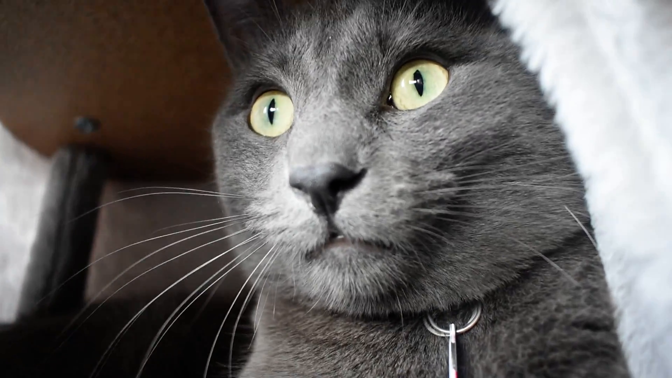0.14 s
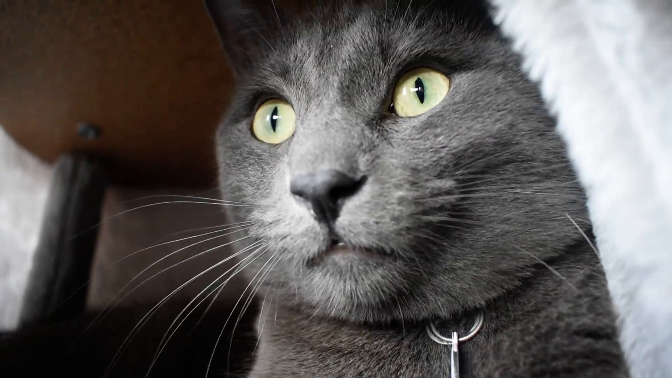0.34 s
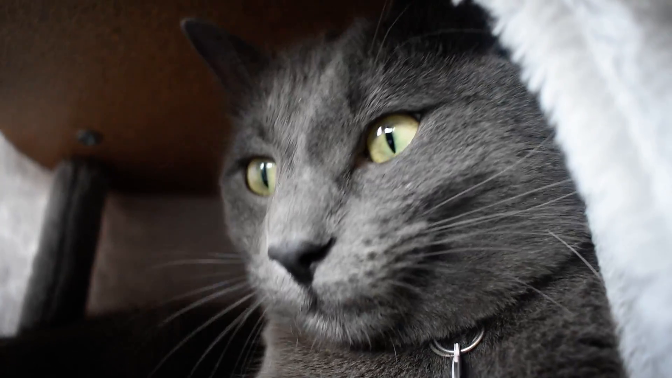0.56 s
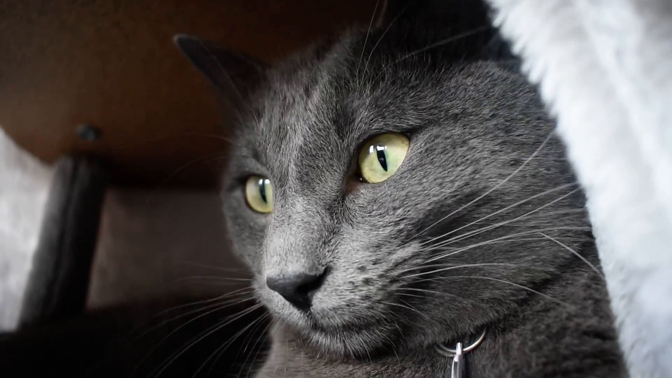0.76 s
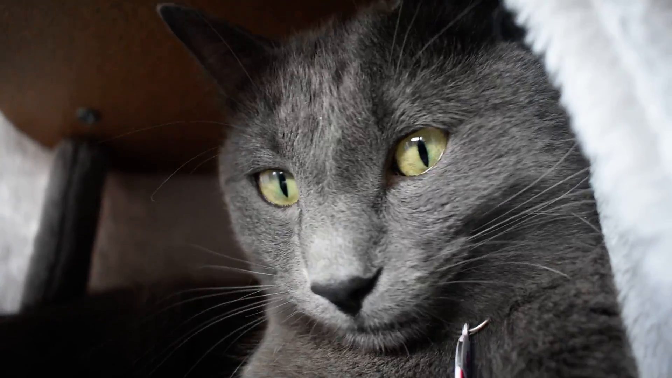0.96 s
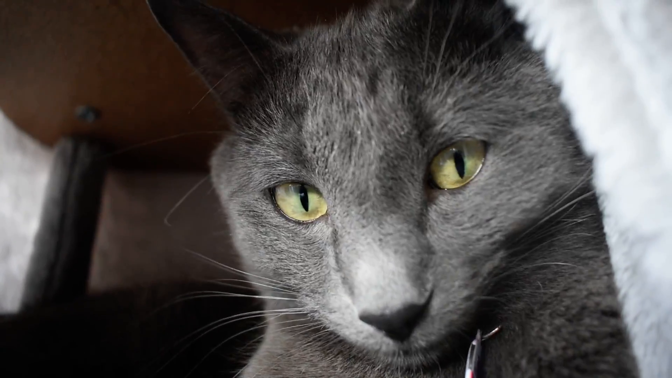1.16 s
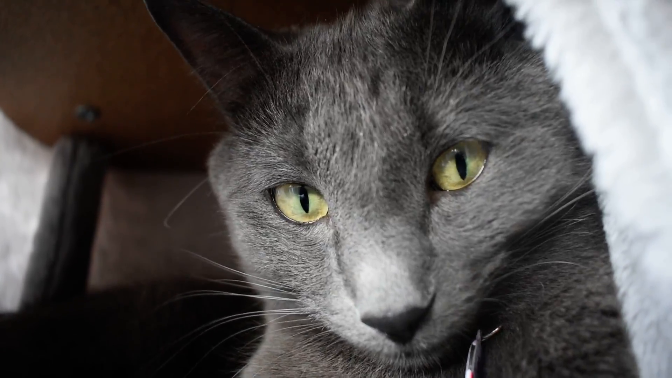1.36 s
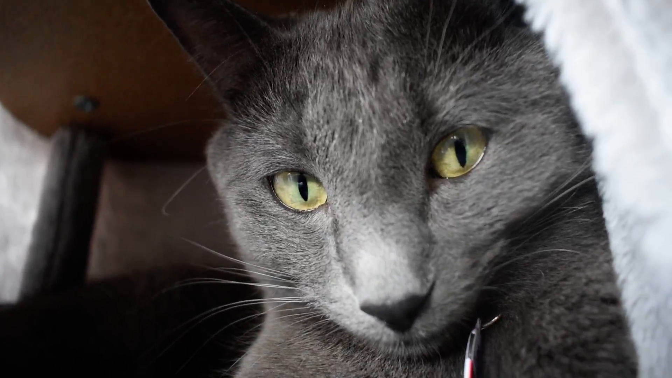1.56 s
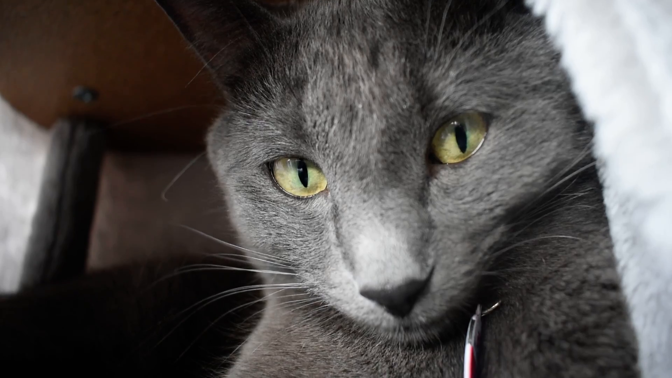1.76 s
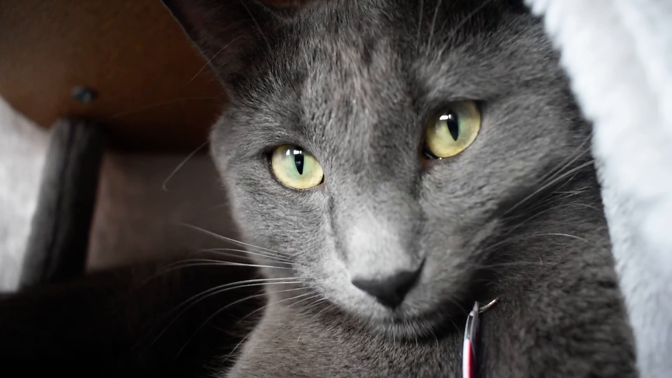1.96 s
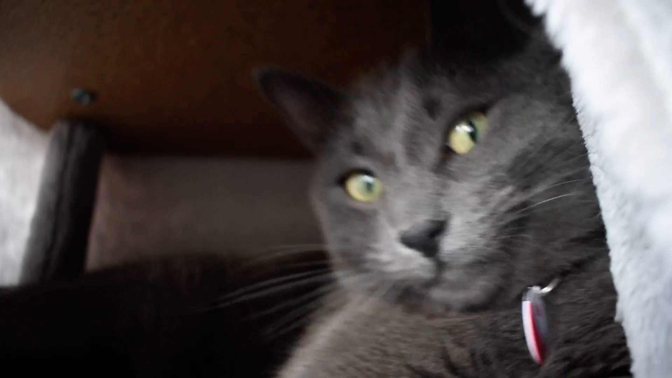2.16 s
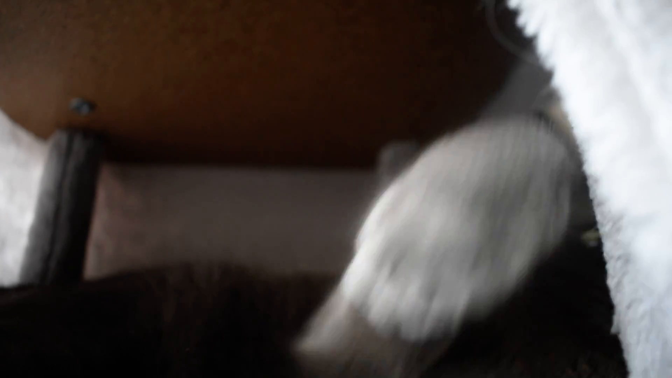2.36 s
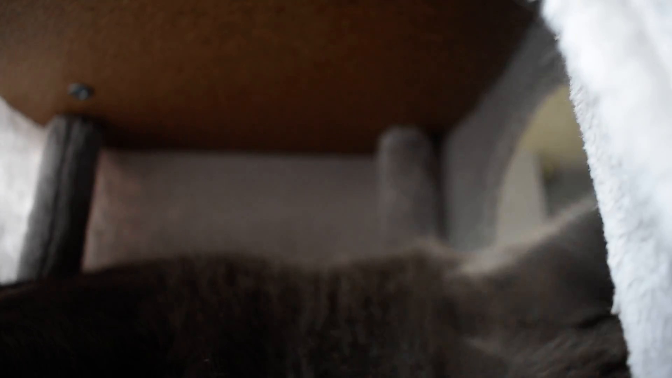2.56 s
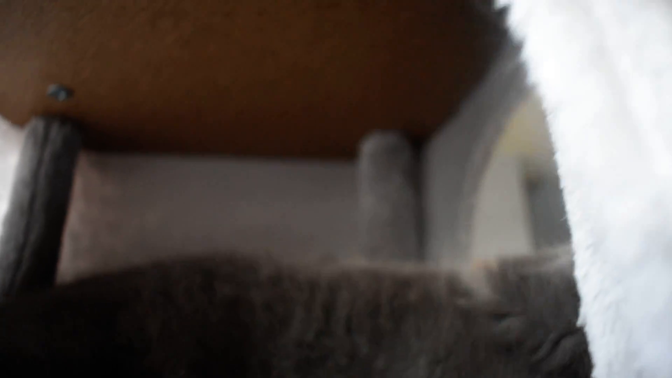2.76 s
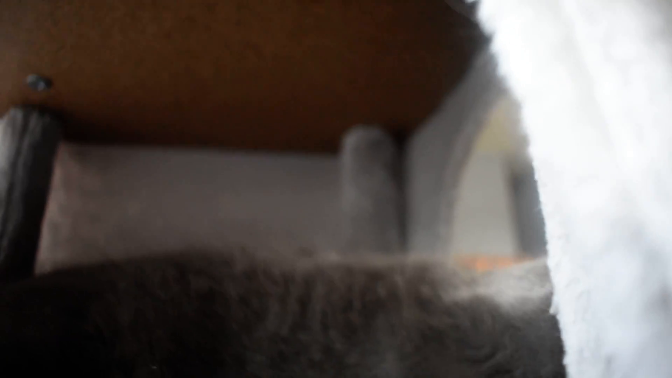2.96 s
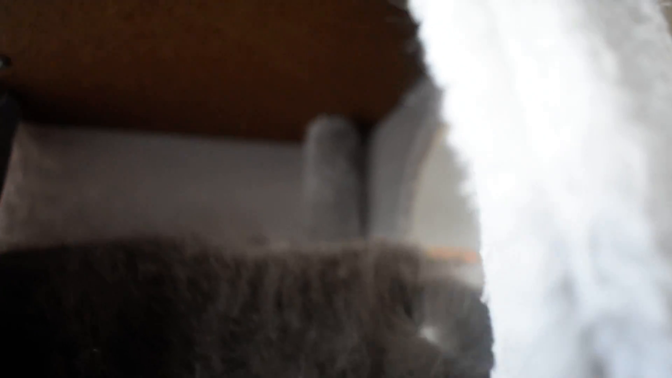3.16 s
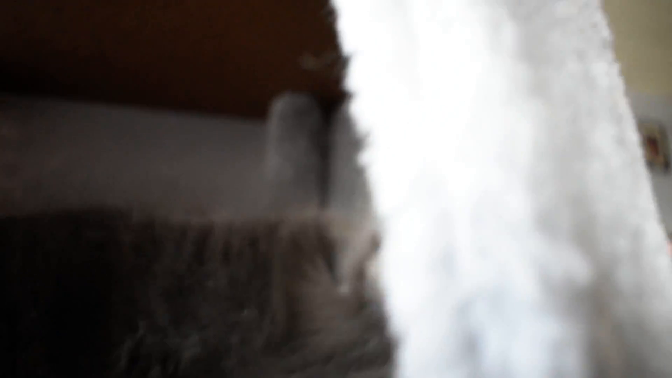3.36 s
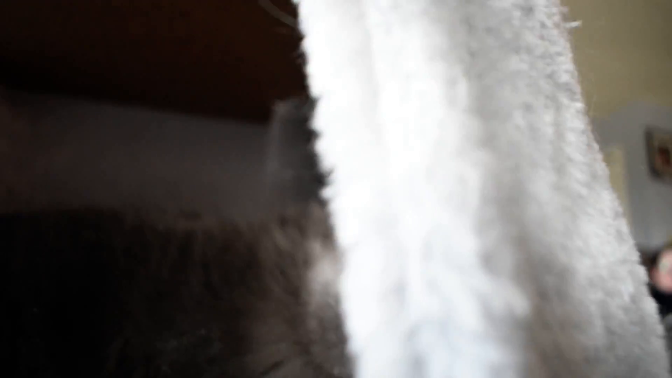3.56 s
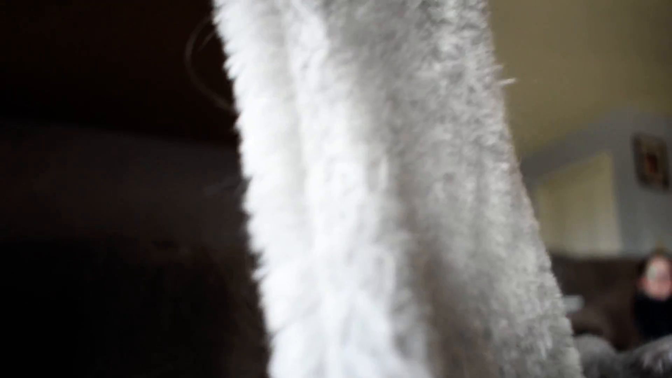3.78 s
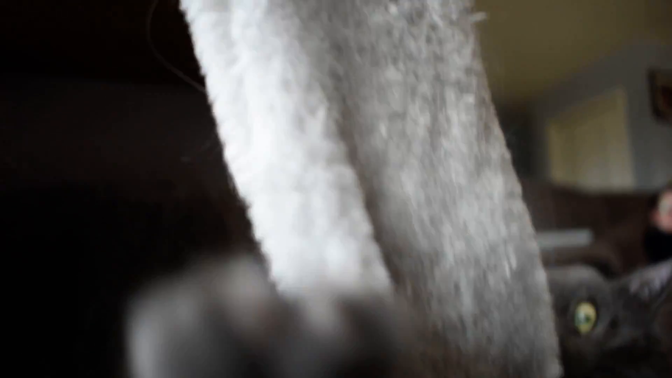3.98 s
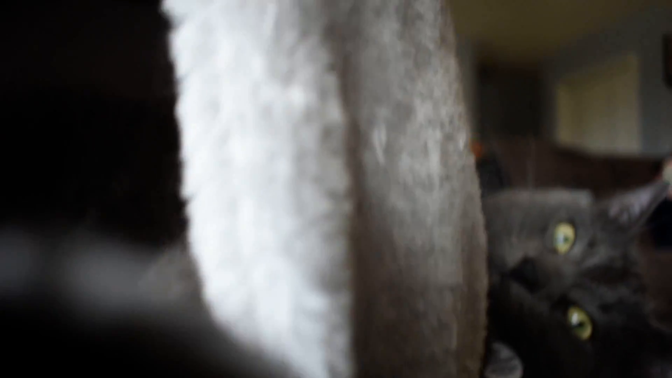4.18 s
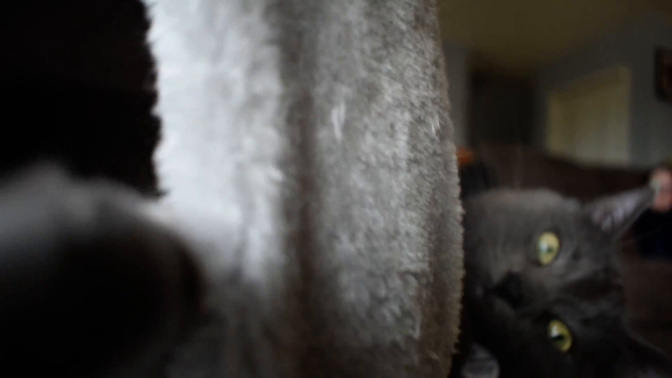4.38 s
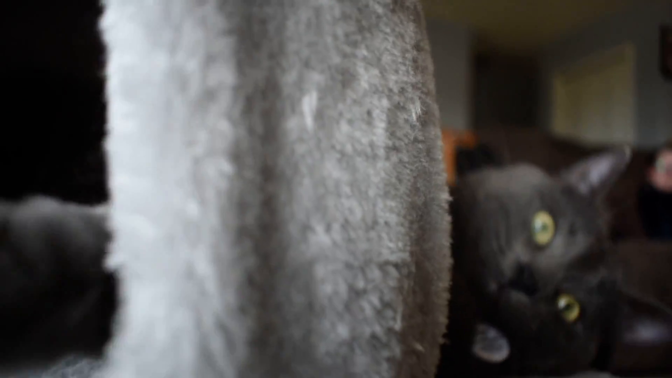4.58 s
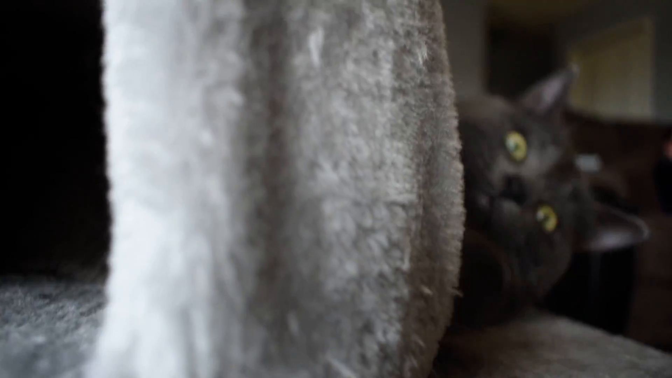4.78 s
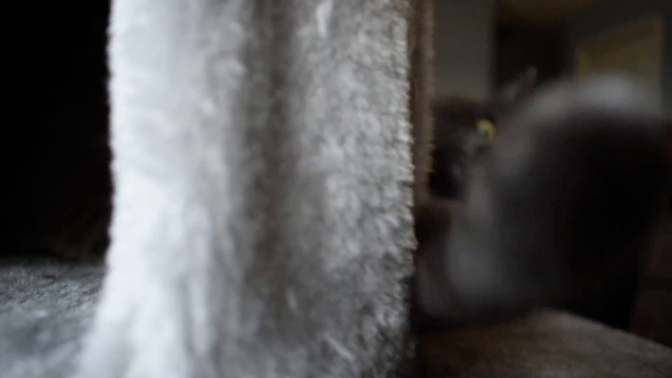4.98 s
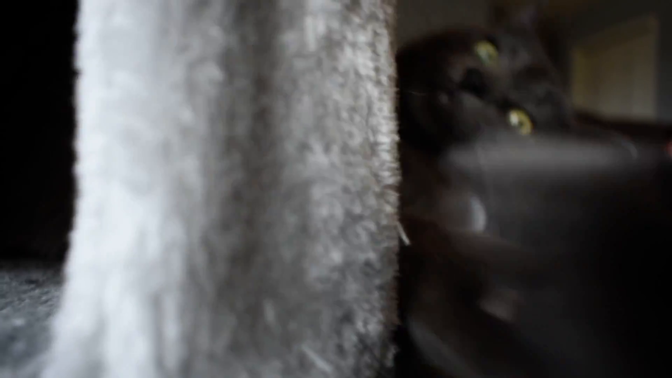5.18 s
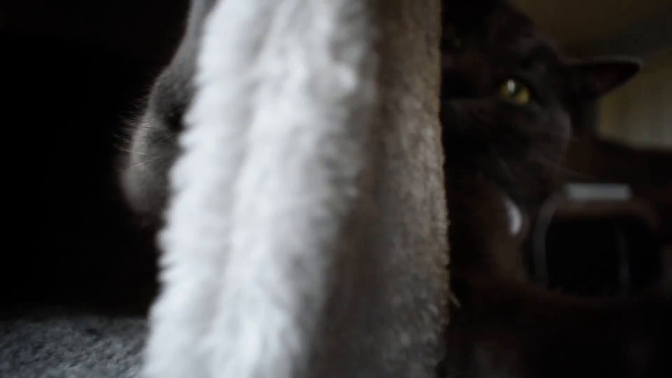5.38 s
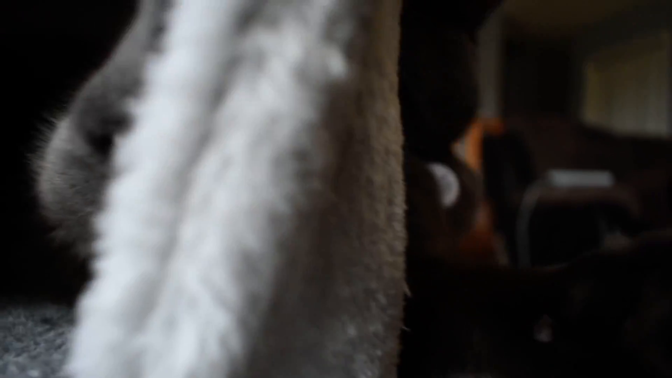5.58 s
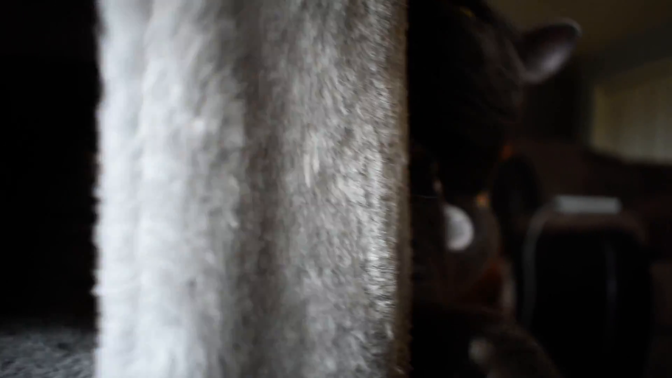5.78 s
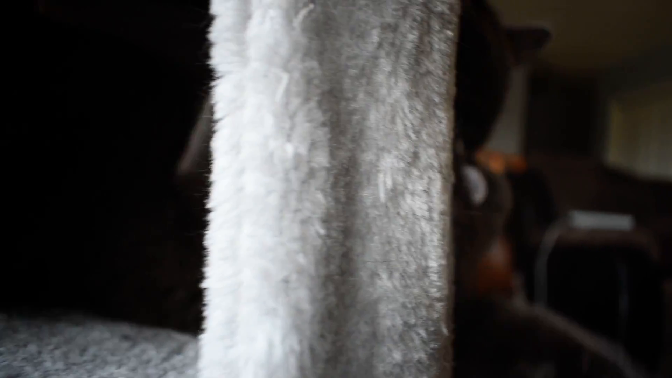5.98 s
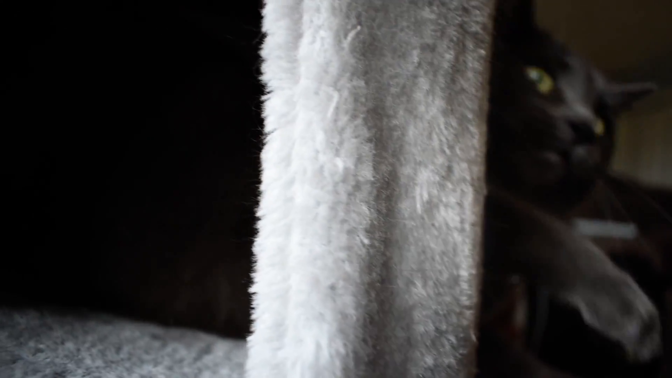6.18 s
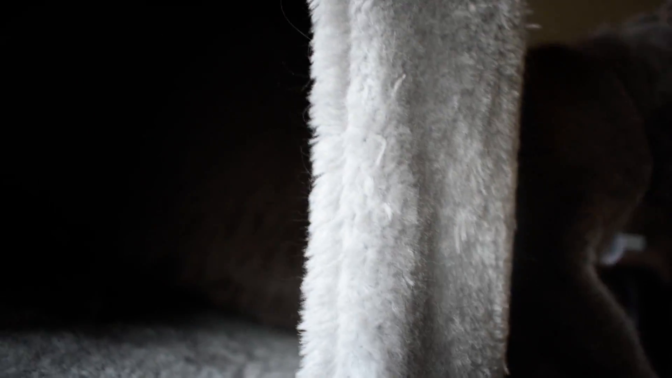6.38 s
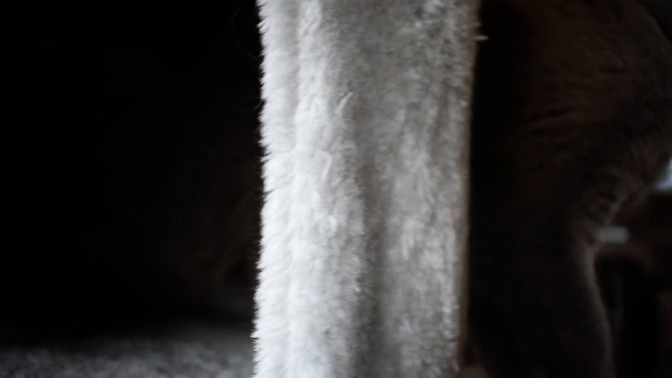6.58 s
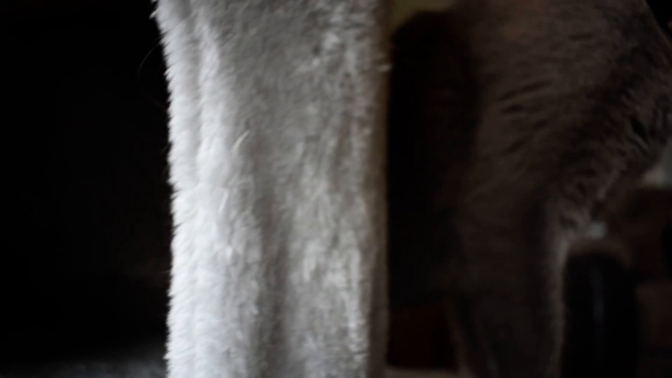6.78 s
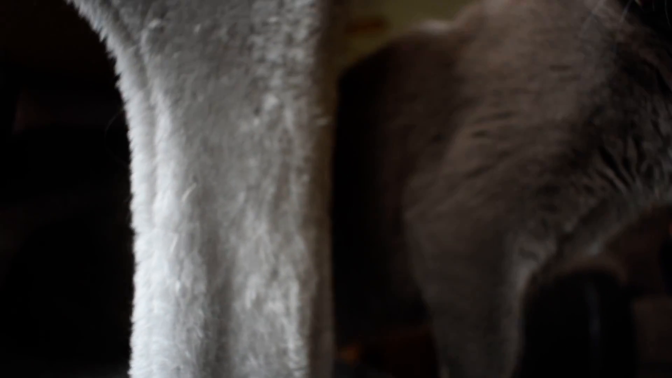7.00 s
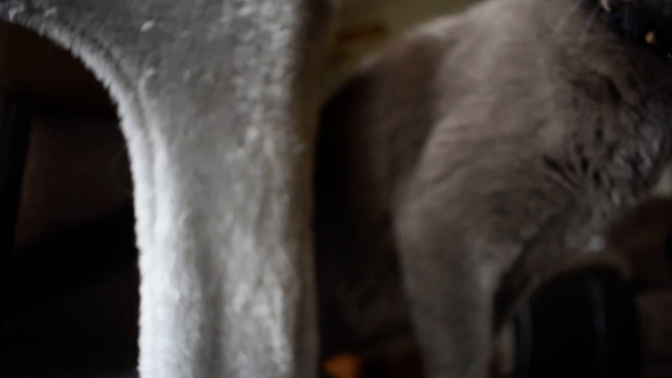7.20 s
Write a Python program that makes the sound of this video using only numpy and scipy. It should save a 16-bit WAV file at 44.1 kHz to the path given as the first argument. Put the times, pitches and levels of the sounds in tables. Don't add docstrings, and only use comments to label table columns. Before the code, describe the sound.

In a quiet room, a cat rubs faintly against fleece very close to the microphone as a collar tag's jingle dies away. A hollow thud sounds across the room. Rustling grows brisk and hissy with soft paw pats and a small knock, another distant thud follows, then one hard, rattling claw swipe hits the microphone casing. Lighter brushing and tiny ticks remain over low room tone.

```python
import sys
import numpy as np
from scipy import signal
from scipy.fft import rfft, irfft, next_fast_len
from scipy.io import wavfile
from scipy.ndimage import uniform_filter1d

SR = 44100
rng = np.random.default_rng(int(sys.argv[2]) if len(sys.argv) > 2 else 0)


def store_pcm(level_fs):
    pcm = np.round(np.clip(level_fs, -1, 1) * 32767).astype(np.int16)
    wavfile.write(sys.argv[1], SR, np.atleast_2d(pcm).T)


def decibels_to_gain(level_db):
    exponent = np.asarray(level_db, float) / 20
    return 10 ** exponent


N = 319501


def evened(x):
    return x / np.sqrt(np.mean(x ** 2) + 1e-20)


def read(points, hz):
    f, value = np.transpose(points)
    return np.interp(np.log(hz + 1), np.log(f + 1), value)


def add(mix, at_s, sound):
    part = mix[round(at_s * SR):][:len(sound)]
    part += sound[:len(part)]


def coloured(x, spectrum):
    size = next_fast_len(len(x))
    gain = decibels_to_gain(read(spectrum, np.fft.rfftfreq(size, 1 / SR)))
    return evened(irfft(rfft(x, size) * gain, size)[:len(x)])


def resonate(x, hz, width_hz):
    r = np.exp(-np.pi * width_hz / SR)
    return signal.lfilter([1, 0, -1], [1, -2 * r * np.cos(2 * np.pi * hz / SR), r * r], x)


def wander(per_s):
    pole = np.exp(-2 * np.pi * per_s / SR)
    return evened(signal.lfilter([1], [1, -pole], rng.standard_normal(N)))


def fibres(per_s, spread_db, flicker_db):
    slips = decibels_to_gain(spread_db * np.minimum(rng.exponential(1, N), 4)) * (rng.random(N) < per_s / SR)
    grit = 0.5 * evened(slips * rng.standard_normal(N)) + rng.standard_normal(N)
    return grit * decibels_to_gain(flicker_db * wander(35))


def patchy(x, depth_db):
    z = signal.stft(x, nperseg=512)[2]
    field = uniform_filter1d(rng.standard_normal(z.shape), size=12, axis=0)
    field = uniform_filter1d(field, size=8, axis=1)
    return evened(signal.istft(z * decibels_to_gain(depth_db * evened(field)), nperseg=512)[1][:N])


def strokes():
    # [start t/s, swell t/s, fade t/s, crest fur
    # hiss level/dB, crest drag level/dB]
    rubs = [
        (0, 0.0029, 0.17, -63, -49),
        (.21, 0.39, 0.14, -57.5, -56.5),
        (.79, 0.035, 0.13, -56.5, -58),
        (1.0, 0.051, .06, -62, -61),
        (1.22, 0.36, 0.15, -54, -51.5),
        (2.0, 0.17, 0.23, -56.5, -53),
        (2.2, .12, 0.26, -59.5, -55),
        (2.61, 0.14, 0.43, -59.5, -51.5),
        (2.9, 0.34, 0.18, -57.5, -54.5),
            (3.317, .004, 0.072, -49, -49), (3.319, 0.066, 0.14, -40, -43.5),
              (3.5, 0.066, 0.43, -47, -47.5), (3.55, 0.15, 0.045, -48, -49.5),
              (3.77, 0.083, 0.11, -44.5, -53), (3.941, 0.021, 0.15, -44, -46),
              (4.14, 0.021, 0.26, -55, -54.5), (4.34, .04, 0.22, -56.5, -70), (4.47, 0.024, 0.32, -58, -49),
              (4.71, 0.02, 0.23, -63, -58), (4.9, 0.065, 0.24, -52.5, -57),
              (5.03, 0.28, 0.27, -48.5, -52.5),
            (5.32, 0.0098, 0.044, -41.5, -45.5), (5.36, .01, 0.3, -51.5, -56),
               (5.48, 0.062, 0.34, -52, -56), (5.721, 0.16, .1, -48.5, -56),
               (5.93, 0.13, 0.18, -43.5, -44.5), (6.1, .1, 0.3, -52.5, -54), (6.25, 0.044, 0.15, -53, -63),
               (6.42, 0.12, .05, -58.5, -60), (6.55, 0.24, 0.36, -60.5, -59),
               (6.9, .015, 0.075, -55.5, -54.5), (6.9, 0.099, 0.12, -60.5, -66),
               (7.07, 0.11, 0.11, -55, -51.5), (7.22, .02, .1, -58, -47.5)]
    touch_s, swell_db, fade_db = 0.023, 10.5, 18
    t = np.arange(N // 64 + 2) * 64 / SR
    power = 1e-12
    for start_s, swell_s, fade_s, *crests_db in rubs:
        u = t - start_s
        swell_s = max(swell_s, 0.003)
        shape_db = np.minimum(swell_db * (u / swell_s - 1), fade_db * (swell_s - u) / fade_s)
        shape = decibels_to_gain(shape_db) * np.clip(u / touch_s + 1, 0, 1)
        power = power + np.outer(decibels_to_gain(crests_db), shape) ** 2
    return [np.interp(np.arange(N) / SR, t, np.sqrt(p)) for p in power]


def rubbing():
    # [f/Hz, density level/dB per Hz]
    fur_spectrum = [(880, -39), (1500, -4), (1760, 0), (4160, 1.5), (4780, 1), (5280, 2.5), (7920, 2),
                    (11100, -17), (15100, -32), (16000, -49)]
    # [f/Hz, density level/dB per Hz]
    drag_spectrum = [(150, 4), (250, -7.5), (388, -4), (531, -6), (647, 1), (761, -1.5), (855, -1),
                     (1140, -5.5), (1250, -4), (4000, -13.5), (5200, -51), (8800, -120)]
    fur = coloured(fibres(per_s=8600, spread_db=3.5, flicker_db=1.35), fur_spectrum)
    fur = patchy(fur, depth_db=1.0)
    drag = coloured(fibres(per_s=1500, spread_db=2.0, flicker_db=1.97), drag_spectrum)
    drag = signal.sosfilt(signal.butter(2, 200, "high", fs=SR, output="sos"), drag)
    hiss_level, drag_level = strokes()
    return hiss_level * fur + drag_level * drag


def catches():
    # [t/s, peak level/dB, centre f/Hz, t60/s]
    snags = [(0.7971, -42, 7730, 0.1), (.262, -45, 8200, .05), (2.748, -37, 7800, .06),
             (2.758, -39.5, 8440, 0.045), (3.317, -28.5, 8200, 0.35), (3.3645, -27.5, 7900, 0.15),
             (3.5239, -28, 6800, 0.071), (3.5693, -30, 7700, 0.13), (3.6626, -32.5, 7500, 0.31),
             (3.795, -35, 7090, 0.086), (3.833, -34, 6900, 0.12), (3.951, -25.5, 6700, 0.2),
             (4.372, -41, 6500, .1), (4.498, -38.5, 8440, .06), (4.635, -46, 7000, 0.17),
             (4.9202, -40, 6160, 0.1), (5.334, -27, 7000, 0.093)]
    out, t = np.zeros(N), np.arange(9000) / SR
    for at_s, db, hz, t60_s in snags:
        burst = resonate(resonate(rng.standard_normal(9000), hz, 2100), hz, 2100)
        add(out, at_s, decibels_to_gain(db - 15 - 60 * t / t60_s) * evened(burst))
    return out


def tap(db, hz, t60_s, snap, snap_hz, push_s=0):
    t = np.arange(5000) / SR
    fade = decibels_to_gain(-60 * np.maximum(t - push_s, 0) / t60_s)
    shake = rng.standard_normal(5000) * fade
    shake[0] = 7.0
    width_hz = 0.95 * snap_hz
    crack = resonate(resonate(shake, snap_hz, width_hz), snap_hz, width_hz)
    ring = fade * np.sin(2 * np.pi * hz * t) * (1 - np.exp(-5.0 * hz * t))
    blow = (1 - snap) * ring / abs(ring).max() + snap * crack / abs(crack).max()
    return decibels_to_gain(db) * blow / abs(blow).max()


def swipe_blows():
    # [t/s, peak level/dB, f/Hz, t60/s]
    skate = [
        (5.2724, -21, 4700, .009),
        (5.2716, -21, 6800, .016),
        (5.2735, -21, 4200, .015),
        (5.279, -24, 7500, .012),
        (5.2835, -24, 8300, .013),
        (5.2855, -20, 8400, .011),
        (5.2897, -21, 4900, .009),
        (5.2963, -25, 8000, .007),
        (5.336, -34, 6900, .04),
        (5.3146, -27, 3700, .012),
    ]
    # [t/s, peak level/dB, ring f/Hz, push t/s]
    shell = [
        (5.2652, -29, 1250, .002),
        (5.272, -28, 1650, .004),
        (5.279, -11.5, 1450, 0.0017),
        (5.279, -19.5, 2200, 0.002),
        (5.2848, -9.3, 1490, 0.0027),
        (5.2995, -26, 1500, .003),
        (5.2962, -17, 1300, .001),
        (5.2962, -22.5, 2600, 0.0015),
        (5.312, -32, 1500, 0.0042),
    ]
    # [t/s, peak level/dB, ring f/Hz, t60/s]
    jolts = [
        (5.2648, -29, 330, 0.04),
        (5.2699, -20.5, 205, 0.05),
        (5.2799, -17.5, 1050, 0.035),
        (5.2795, -26, 420, 0.04),
        (5.2958, -18.5, 300, 0.028),
        (5.3015, -28, 450, 0.04),
    ]
    blows = [(*row, 0.62, row[2]) for row in skate]
    blows += [(s, db, hz, 0.006, 0.15, 2900, push_s) for s, db, hz, push_s in shell]
    blows += [(*row, 0.41, 900) for row in jolts]
    return blows


def paw_blows():
    # [t/s, peak level/dB, ring f/Hz, snap share 0-1]
    pads = [(0.294, -42.5, 600, .6), (0.361, -47, 794, 0.47), (0.5505, -43, 900, 0.45),
            (.589, -47, 1770, 0.34), (0.6335, -40, 800, 0.5), (0.704, -52, 854, 0.3),
            (0.84, -45.5, 861, 0.4), (0.937, -45, 528, 0.3), (1.197, -44.5, 476, 0.44),
            (2.3187, -41, 1700, 0.4), (2.3285, -41, 1150, 0.44), (2.83, -50, 961, 0.7),
            (2.779, -44, 700, 0.5), (3.046, -44.5, 540, 0.85), (3.663, -29, 323, 0.46),
            (3.99, -36.5, 378, 0.5), (6.034, -32.5, 770, 1)]
    # [t/s, peak level/dB, ring f/Hz, snap share 0-1]
    claws = [(1.5334, -30, 7900, 0.5), (2.621, -45, 4900, 0.6), (5.662, -43.5, 4800, 0.2),
             (5.8773, -43, 7800, 0.5), (4.726, -50, 4500, .1), (6.3042, -40.5, 5900, 0.2),
             (6.4645, -47.5, 4600, 0.2), (7.1858, -42, 6000, 1), (6.79, -40.5, 6600, .81),
             (6.5302, -49, 7200, .2), (6.507, -52, 8500, .3), (5.8652, -42, 4600, 0.9)]
    # [t/s, peak level/dB, ring f/Hz]
    scratches = [
        (2.7483, -45, 1950),
        (2.752, -47, 2240),
        (2.757, -37, 2200),
        (2.7608, -39, 1560),
        (2.7642, -36, 1650),
        (2.7774, -58, 1390),
        (5.866, -46, 1800),
        (7.094, -43, 2600),
    ]
    # [t/s, peak level/dB, ring f/Hz, t60/s]
    bumps = [
        (0.928, -47.5, 237, 0.13),
        (2.324, -40, 264, 0.016),
        (3.037, -41, 217, 0.069),
        (3.662, -49, 330, 0.028),
        (4.092, -39, 83.4, 0.092),
        (5.367, -39, 108, 0.032),
        (5.368, -33, 338, .015),
    ]
    # [t/s, peak level/dB, ring f/Hz, t60/s, snap share 0-1]
    knuckles = [
        (1.533, -37, 556, .04, 0.05),
        (1.582, -25.5, 890, 0.033, 0.1),
        (4.1622, -32.5, 1625, 0.025, .05),
        (4.162, -34, 2770, 0.015, .05),
        (4.163, -30, 640, 0.019, 0.45),
        (4.162, -31, 1000, 0.024, 0.47),
        (4.1629, -34.5, 400, 0.061, 0.6),
        (6.2045, -40, 2940, .014, 0.2),
        (6.2045, -49, 790, 0.016, 0.1),
    ]
    blows = [(s, db, hz, 0.02, snap, 1660) for s, db, hz, snap in pads]
    blows += [(s, db, hz, 0.0071, snap, 6000) for s, db, hz, snap in claws]
    blows += [(*row, 0.0099, 0.53, 2300) for row in scratches]
    blows += [(*row, 0.27, 464) for row in bumps]
    blows += [(*row, 1.35 * row[2]) for row in knuckles]
    return blows


def paws():
    out = np.zeros(N)
    for at_s, *blow in swipe_blows() + paw_blows():
        add(out, at_s, tap(*blow))
    port_hz = 11000
    return signal.lfilter(*signal.butter(2, port_hz, fs=SR), out)


def cracks():
    # [t/s, peak level/dB, ring f/Hz, t60/s, push t/s]
    contacts = [(5.27072, -16, 4880, .007, .0003), (5.27076, -16.5, 6580, .008, .0003),
                (5.27073, -13, 5400, .002, .0003), (5.27067, -19, 3670, .005, .0003),
                (5.27078, -21, 8200, .004, .0002), (5.2792, -21, 2900, .009, .0008),
                (5.279, -27, 760, .025, .001), (5.2961, -27, 800, .015, .001),
                (5.3005, -36, 9000, .005, .001), (5.877, -30.5, 5200, .0025, .0004),
                (5.877, -39, 4000, .003, .0003), (6.2045, -37, 4400, .005, .0006),
                (7.1846, -33, 6600, .002, .0001), (7.1991, -36, 6800, .002, .0001),
                (7.2157, -36, 6500, .002, .0001), (5.2963, -17, 1700, .002, .0002),
                (5.6617, -43, 5000, .003, .0004), (2.3295, -45, 1700, .01, .001),
                (2.3286, -38.5, 430, .02, .003), (2.7487, -41, 900, .012, .001),
                (2.7487, -42, 1950, .01, .001)]
    out = np.zeros(N)
    for at_s, db, hz, t60_s, push_s in contacts:
        add(out, at_s, tap(db, hz, t60_s, 0, hz, push_s))
    return out


def ticks():
    # [t/s, peak level/dB, low f/Hz, high f/Hz, t60/s]
    claw_ticks = [(0.551, -40.5, 1900, 2840, .02), (.6345, -44.5, 1500, 2880, .015),
                  (0.7047, -45.5, 1800, 2750, .015), (2.7485, -41, 900, 3800, .015),
                  (2.8315, -44, 400, 2500, .008), (2.852, -41, 600, 3200, .015),
                  (2.856, -43, 300, 1500, .012), (3.8345, -33, 5000, 8000, .01),
                  (4.1468, -44, 700, 2600, .012), (4.158, -44, 500, 2500, 0.012),
                  (4.4845, -33.5, 1100, 3460, 0.013), (4.5065, -30.5, 1200, 3500, .012),
                  (4.524, -31, 600, 1800, .02), (5.2713, -19, 3400, 7000, 0.025),
                  (5.279, -21, 2000, 3300, 0.012), (5.2835, -25, 6500, 10500, .02),
                  (.937, -44, 500, 2200, .015), (1.197, -46.5, 500, 2500, .015),
                  (5.2903, -27.5, 7800, 9300, 0.013), (5.3, -31, 6000, 9800, 0.021),
                  (5.3138, -25, 2000, 7200, 0.039), (5.3215, -39, 5000, 9500, .06),
                  (5.3255, -35, 5000, 9500, .03), (6.2044, -39, 2600, 5500, .01),
                  (6.3085, -44, 8000, 14500, .005), (6.4475, -49, 5000, 13000, .005),
                  (6.4612, -54, 7500, 13000, .005), (6.5375, -31.5, 3000, 14000, .009),
                  (7.1846, -33, 1400, 9000, 0.004), (7.1991, -38, 2500, 10000, .003),
                  (7.2157, -35, 2200, 9500, .003), (5.2865, -23, 2000, 3800, .04),
                  (5.2983, -23.5, 2000, 3800, 0.025), (5.3165, -33, 1700, 3200, .05),
                  (2.7605, -43, 2500, 4200, .015), (5.877, -42, 3500, 6500, .004),
                  (3.318, -36, 2500, 4500, .12), (3.366, -33, 2600, 4200, .04),
                  (3.3725, -31, 5000, 8600, .025), (5.279, -25, 6500, 10500, .014)]
    out, t = np.zeros(N), np.arange(3000) / SR
    for at_s, db, low_hz, high_hz, t60_s in claw_ticks:
        shake = rng.standard_normal(3000) * decibels_to_gain(-60 * t / t60_s)
        shake[0] = 4.0
        tick = signal.lfilter(*signal.butter(2, [low_hz, high_hz], "band", fs=SR), shake)
        tick = signal.lfilter(*signal.butter(2, 9000, fs=SR), tick)
        add(out, at_s, decibels_to_gain(db) * tick / abs(tick).max())
    return out


def thuds():
    # [t/s, level/dB, struck object]
    blows = [(1.516, -49.5, "box"), (1.534, -32, "box"), (1.552, -37.5, "box"), (1.581, -35.5, "box"),
             (4.4766, -36.5, "board"), (4.503, -36.5, "board"), (4.55, -45, "board"),
             (4.59, -46.5, "board"), (5.46, -58, "seat"), (5.503, -47.5, "seat"), (5.521, -52, "seat"),
             (5.555, -51, "seat"), (.15, -52.5, "fold"), (.53, -57, "fold"), (3.36, -50, "fold"),
             (4.6, -49.5, "fold"), (5.98, -54, "fold"), (6.06, -49, "fold"), (6.15, -53, "fold"),
             (4.348, -49.5, "leg"), (4.376, -47.5, "leg"), (4.479, -48, "leg")]
    names = ["box", "board", "seat", "fold", "leg"]
    # [f/Hz, density level/dB per Hz]
    spectra = [
        [(47, -44), (80, -21), (117, 2.5), (150, -19), (286, -15.5), (885, 3), (1660, -10), (1830, -14),
         (2070, -11), (2580, -18), (2920, -16), (7850, -31), (10000, -42), (13000, -76), (22000, -120)],
        [(150, -58), (250, -45), (460, -9), (494, -4), (539, -12.5), (605, -1), (661, -11), (710, -1.5),
         (922, -9.5), (1250, -5), (2110, -9), (2270, -8.5), (8000, -36.5), (10400, -58), (17600, -120)],
        [(300, -26), (700, 0), (800, -15), (1010, -7), (1340, 4), (1740, 6.5), (2290, -4), (3000, -9),
         (6000, -12), (10000, -60)],
        [(250, -40), (500, -5), (700, 4.5), (850, -2.5), (1100, -13), (2000, -22), (4000, -48)],
        [(250, -47), (600, 5.5), (1000, -4), (1500, -3), (2700, -2), (4100, -11), (7000, -14), (10000, -42)],
    ]
    # [f/Hz, t60/s]
    decay = [(250, 0.56), (700, 0.43), (1300, 0.41), (2500, 0.34), (5000, 0.28)]
    objects = dict(zip(names, spectra))
    out = np.zeros(N)
    for at_s, db, name in blows:
        echoes = rng.standard_normal(SR // 2) * (rng.random(SR // 2) < 0.3)
        hz, t, z = signal.stft(coloured(echoes, objects[name]), SR, nperseg=256)
        fade = decibels_to_gain(-60 * t / read(decay, hz)[:, None])
        tail = signal.istft(z * fade, SR, nperseg=256)[1]
        onset = np.minimum(np.arange(len(tail)) / (0.0027 * SR), 1)
        add(out, at_s, decibels_to_gain(db) * tail * onset)
    return out


def hollows():
    # [t/s, peak level/dB, ring f/Hz, t60/s, push t/s]
    notes_hollow = [(.5505, -44, 690, 0.037, .003), (.568, -49, 680, 0.035, .006),
                    (.535, -56, 1400, .05, 0.0091), (1.5355, -27, 700, 0.025, 0.0043),
                    (1.555, -37, 1350, .05, 0.009), (1.6, -37.5, 1180, .08, .015),
                    (1.556, -38, 560, .06, .012), (4.495, -41.5, 1770, .05, 0.014),
                    (4.56, -48, 1770, .06, .015), (1.544, -31, 1100, .06, .004),
                    (1.585, -44, 2100, .05, .008), (1.57, -34, 1150, .035, .005),
                    (1.543, -41, 2100, 0.095, .004), (1.612, -38, 840, 0.045, 0.0073),
                    (4.474, -41, 1250, .06, 0.0083), (4.484, -46, 2800, .03, .004),
                    (4.514, -42, 720, 0.04, 0.011), (4.545, -43, 1250, .06, 0.013),
                    (4.6, -47, 1250, 0.089, .01), (4.636, -52, 1300, 0.088, 0.0088),
                    (4.5, -43, 1240, .04, .008), (5.289, -27, 1560, 0.059, .002),
                    (1.598, -40, 960, .09, .012), (1.632, -45, 940, .07, .01), (1.657, -46, 860, .07, .012),
                    (1.69, -50, 1150, .1, .02), (1.59, -45, 1670, .06, .012), (4.48, -44, 3220, .03, .008),
                    (4.48, -44, 2200, .04, .008), (4.52, -41, 1250, .03, .006), (4.61, -45, 620, .08, .015),
                    (4.555, -46, 780, .07, .01), (3.36, -43, 720, .04, .01), (3.385, -41, 740, .04, .008),
                    (3.401, -42, 730, .05, .008), (4.66, -52, 700, .1, .02)]
    out = np.zeros(N)
    onset = np.minimum(np.arange(1, 5001) / (0.0028 * SR), 1)
    for at_s, db, hz, t60_s, push_s in notes_hollow:
        add(out, at_s, tap(db, hz, t60_s, 0, hz, push_s) * onset)
    return out


def tag():
    # [f/Hz, width f/Hz, level/dB]
    modes = [(695, 76, -58), (1020, 66, -60), (1610, 30, -64), (2370, 30, -66), (2600, 30, -64),
             (3200, 40, -72), (4070, 35, -65), (5050, 70, -67.5), (5360, 30, -75), (5890, 30, -75),
             (6100, 140, -62), (6350, 30, -72), (6670, 30, -66), (6940, 20, -60), (7190, 60, -70),
             (7710, 40, -66), (8230, 40, -71), (8900, 44, -72), (9390, 200, -69)]
    t = np.arange(SR // 2) / SR
    ring = sum(decibels_to_gain(db) * evened(resonate(rng.standard_normal(len(t)), hz, w)) for hz, w, db in modes)
    fade = decibels_to_gain(-60 * np.maximum(t - 0.05, 0) / 0.28)
    return np.pad(ring * fade, (0, N - len(t)))


def air():
    # [f/Hz, density level/dB per Hz]
    tone_spectrum = [(12, -43), (20, -15), (96, -0.5), (187, -4), (248, -8), (718, -11), (1120, -14),
                     (1400, -14.5), (6910, -25), (14700, -38.5), (16000, -39)]
    # [f/Hz, width f/Hz, rms level/dB]
    hums = [(119.6, 6.9, -64.5), (196.3, 7.4, -65), (75, 7.8, -72.5), (166.5, 25, -70)]
    out = decibels_to_gain(-56.5) * coloured(rng.standard_normal(N), tone_spectrum)
    for hz, width_hz, db in hums:
        out += decibels_to_gain(db) * evened(resonate(rng.standard_normal(N), hz, width_hz))
    return out


def scene():
    close = rubbing() + catches() + paws() + cracks() + ticks()
    far = thuds() + hollows() + tag() + air()
    return (close + far)[None]


def top_cut(x):
    return signal.sosfilt(signal.butter(12, 16500, fs=SR, output="sos"), x)


def record(dry):
    lowpass = signal.firwin(401, 15800, window=("kaiser", 6), fs=SR)
    kept = signal.oaconvolve(dry, lowpass[None], "same")
    return top_cut(kept + decibels_to_gain(-22) * (dry - kept))


dry = scene()
out = record(dry)
store_pcm(out)
```